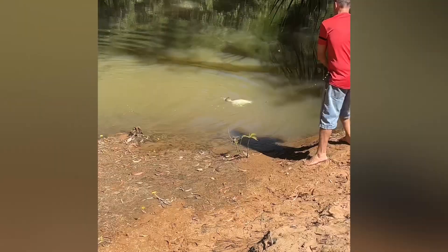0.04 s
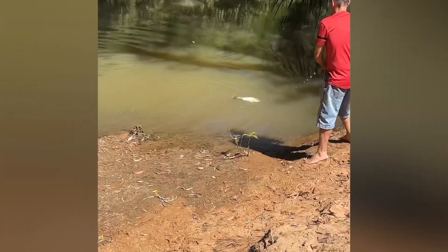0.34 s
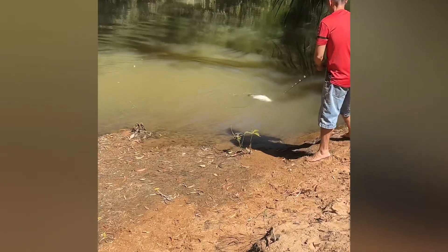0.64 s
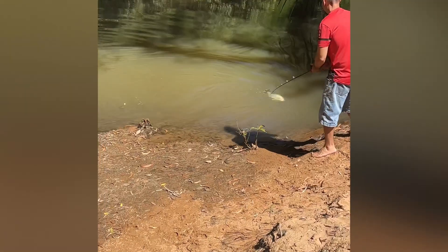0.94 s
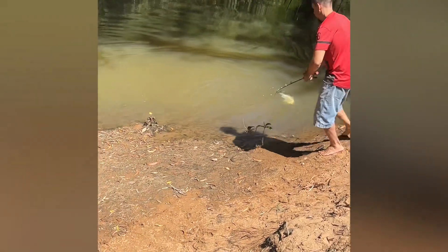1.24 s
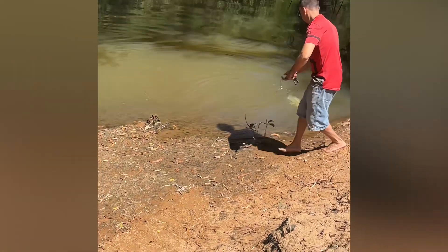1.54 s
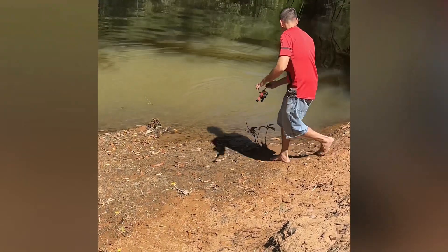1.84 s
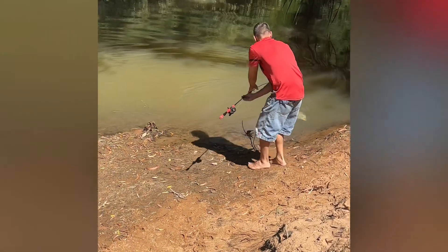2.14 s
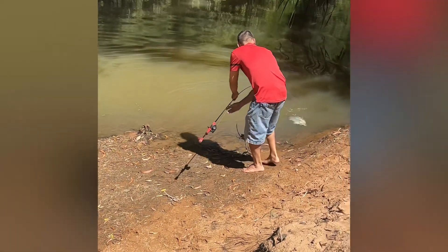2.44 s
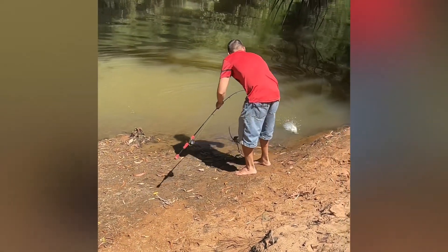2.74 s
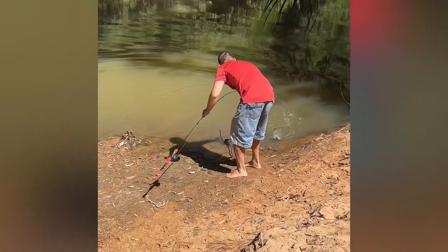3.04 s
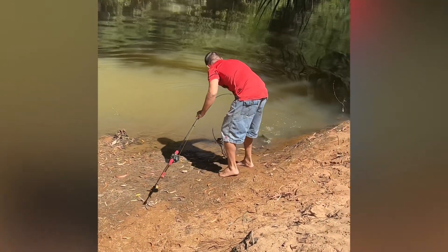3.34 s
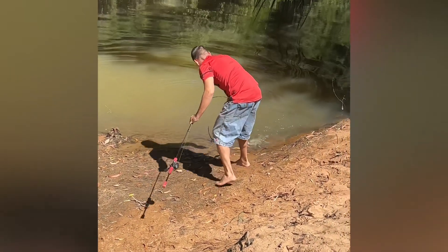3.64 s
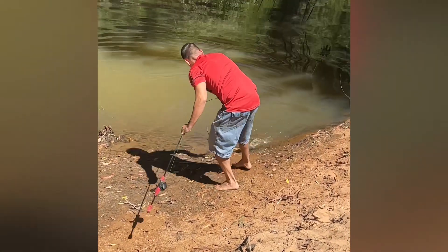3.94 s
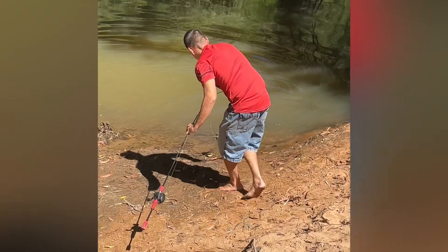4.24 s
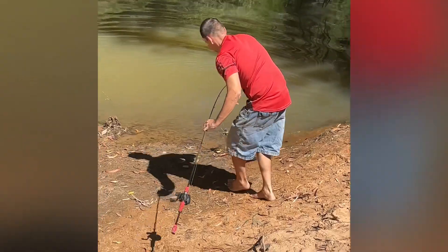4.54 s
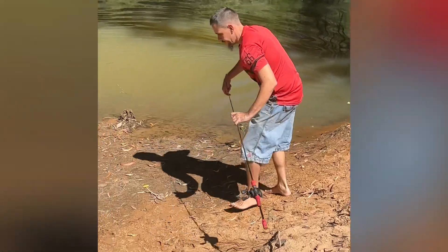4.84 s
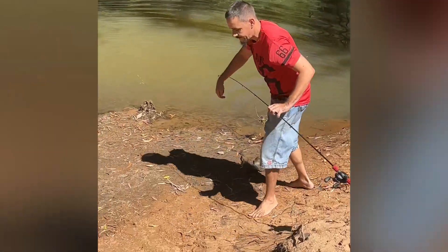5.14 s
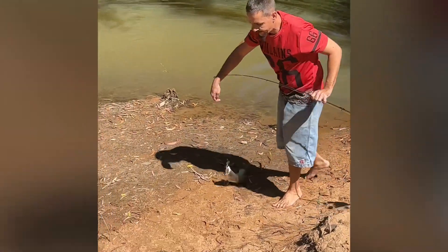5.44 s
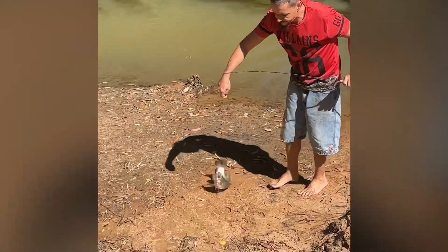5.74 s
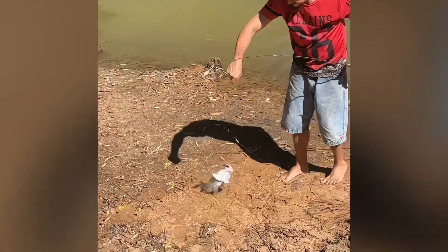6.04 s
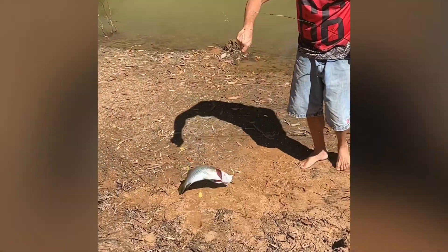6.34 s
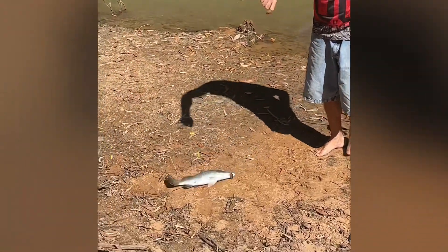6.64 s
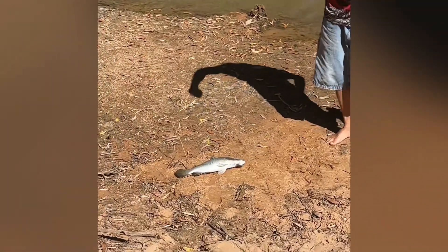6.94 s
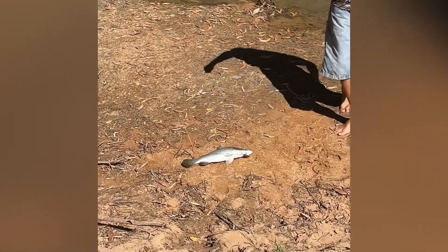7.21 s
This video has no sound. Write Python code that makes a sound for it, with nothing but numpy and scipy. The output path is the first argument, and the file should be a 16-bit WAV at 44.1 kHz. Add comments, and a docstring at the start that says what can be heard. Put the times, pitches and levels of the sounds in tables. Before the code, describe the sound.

A steady outdoor hiss of river and breeze fades in over the first half second and continues throughout, with a few faint sloshes at the start. From about 1 to 1.5 seconds, fingers knock and rub lightly on the hand-held microphone. Three soft, distant hoots follow around 2 seconds. A fishing rod clicks at 2.4 seconds, and a hooked fish makes small splashes and bubbly plops between 2.8 and 3.9. Bare feet scuff and crack dry leaves from about 4.2, and the rod clicks again at 5. Scattered ticks of drops and grit build until, from 6 to 6.5 seconds, the fish thrashes on the dirt close by. This is the loudest part: rapid wet slaps, small pops and dull thuds, with bright leaf crackle and spraying grit. The patter dies away by about 6.8, leaving the hiss until just past 7 seconds.

```python
"""A landed fish thrashes on dry, leaf-littered dirt, close to a hand-held camera.
Its body thuds, its wet flanks and tail slap out trapped air, and each slap throws grit that patters
back onto the leaves. Before that: splashes and bubbles as it is swung from the river, faint rod clicks,
barefoot scuffs, finger knocks on the camera and far hoots, over a steady hiss of river and breeze."""
import sys
import numpy as np
from scipy import signal
from scipy.fft import rfft, irfft, next_fast_len
from scipy.io import wavfile
from scipy.ndimage import uniform_filter1d

SR = 44100
rng = np.random.default_rng(int(sys.argv[2]) if len(sys.argv) > 2 else 0)


def generate_wav(signal):
    """Clip the signal to [-1, 1] and save it as 16-bit WAV at the path in sys.argv[1]."""
    frames = np.transpose(np.atleast_2d(signal))
    scaled = np.clip(frames, -1, 1) * 32767
    pcm = np.round(scaled).astype(np.int16)
    wavfile.write(sys.argv[1], SR, pcm)


N = 325193
TIME = np.arange(N) / SR
# wet skin on dirt: t/s, length/s, trapped-air f/Hz, pop level/dB, grit level/dB
SLAPS = [(6.023, .003, 1240, -31.5, -40), (6.0445, 0.0014, 1100, -32, -25),
         (6.0625, 0.0032, 1200, -26.5, -39), (6.079, 0.00094, 1620, -12, -25),
         (6.0821, 0.00076, 3630, -11, -15), (6.084, 0.0008, 1800, -10, -16),
         (6.102, 0.0012, 1110, -26, -24), (6.15, 0.0039, 1200, -25, -17), (6.158, 0.0022, 905, -25, -23),
         (6.18, .003, 1200, -30, -27), (6.199, 0.0011, 3180, -20, -16.5), (6.205, .0008, 2200, -12.5, -20),
         (6.2082, .0016, 1250, -14, -20), (6.2486, 0.0011, 1680, -19, -12),
         (6.2528, 0.0015, 1790, -25, -12.5), (6.262, 0.0011, 3200, -21, -14),
         (6.272, 0.0016, 1810, -19, -24), (6.2773, 0.0011, 2300, -10.5, -8), (6.279, .0006, 2120, -12, -10),
         (6.2802, 0.0015, 1210, -10.5, -18), (6.286, 0.00073, 1100, -23, -31),
         (6.292, 0.003, 1400, -21, -22), (6.341, 0.0036, 1300, -28, -15.5), (6.385, 0.0019, 3000, -33, -26),
         (6.394, 0.0015, 1880, -29, -16.5), (6.4068, 0.00088, 1070, -20.5, -34),
         (6.42, .001, 1300, -28, -29), (6.4606, 0.00097, 1500, -21.5, -26),
         (6.4738, .0009, 1000, -19.5, -32), (6.486, .0008, 2500, -31, -20), (6.492, .002, 1090, -25.5, -33)]


def slaps(pop_db=0.45, spray_db=0.5, flesh_db=-9.5, flesh_hz=660, noise_share=0.5):
    """Each slap squeezes out air with a sagging pop, smacks dully with the flesh and sprays grit."""
    # grit spray spectrum: f/Hz, density/dB
    spray_spectrum = [(300, -12), (1500, -6), (3500, 0.5), (5500, 3), (8000, 0), (10500, 6.5), (13000, -10),
                      (15500, -1.5)]
    out = np.zeros(N)
    for at_s, length_s, hz, db, grit_db in SLAPS:
        force = blow(length_s, rise=0.47)
        tone = unit_rms(sagging(hz, length_s, sag=0.39))
        pop = (1 - noise_share) * tone + noise_share * band_noise(hz, octaves=0.72)
        flesh = burst(band_noise(flesh_hz, octaves=1.0), blow(1.26 * length_s, rise=0.66))
        spray = coloured(rng.laplace(size=len(force)), spray_spectrum)
        add(out, at_s, gain_of(db + pop_db) * burst(pop, force))
        add(out, at_s, gain_of(db + flesh_db) * flesh)
        add(out, at_s, gain_of(grit_db + spray_db) * burst(spray, force))
    return out


def thuds(trim_db=-1, crumble_gain=0.45, heave_gain=0.26, heave_hz=75):
    """Soft weight on packed earth: low cycles that fall as the contact widens, over a slow heave."""
    # two footfalls, then the fish's body: t/s, level/dB, f/Hz, length/s
    impacts = [(0.952, -35, 66, .011), (3.02, -35, 72, 0.011), (6.035, -29, 109, .007),
               (6.06, -26.5, 298, .0046), (6.077, -20, 165, 0.0064), (6.121, -21, 130, 0.0073),
               (6.1505, -18.5, 240, .004), (6.156, -22, 140, 0.0039), (6.188, -26, 280, .0042),
               (6.205, -24, 120, 0.0057), (6.239, -17, 195, 0.0035), (6.279, -20, 304, 0.0033),
               (6.291, -28, 220, 0.0057), (6.3, -27, 110, 0.0041), (6.329, -26, 210, 0.0057),
               (6.4642, -23, 230, 0.0022), (6.468, -20, 92, 0.0066)]
    out = np.zeros(N)
    for at_s, db, hz, length_s in impacts:
        force = blow(length_s, rise=0.5)
        heave = heave_gain * np.sin(2 * np.pi * heave_hz * TIME[:len(force)])
        push = heave - sagging(hz, 2 * length_s, sag=0.89)
        crumble = crumble_gain * burst(band_noise(1.13 * hz, octaves=0.92), force)
        add(out, at_s, gain_of(db + trim_db) * (force * push + crumble))
    return out


def stirring(rest_db=-63, trim_db=-4.5, lead_s=0.0062, rise_s=0.0091, settle_s=0.024):
    """Litter envelope: slaps throw grit by strength and length; scuffs swell and fade."""
    # bare feet and the fish sliding in the litter: t/s, length/s, level/dB
    scuffs = [(4.14, 0.097, -46), (4.26, 0.15, -46), (5.22, 0.31, -44.5), (5.52, 0.41, -49),
              (5.87, 0.19, -39), (6.088, 0.051, -30), (6.16, 0.072, -26.5), (6.22, 0.05, -24),
              (6.287, 0.09, -25), (6.385, 0.062, -31), (6.49, 0.1, -39), (6.598, 0.19, -42.5)]
    power = np.full(N, gain_of(rest_db) ** 2)
    t = TIME[:SR]
    landing = (1 - np.exp(-(t / rise_s) ** 2)) * np.exp(-t / settle_s) / settle_s
    for at_s, length_s, _, _, grit_db in SLAPS:
        add(power, at_s - lead_s, gain_of(trim_db) ** 2 * gain_of(grit_db) * length_s * landing)
    for at_s, length_s, db in scuffs:
        add(power, at_s, (gain_of(db) * half_sine(length_s)) ** 2)
    return np.sqrt(power)


def litter(ping_db=-7, crumb_db=-14, drag_db=-13.5, side_db=-11):
    """Stirred leaves and crumbs crackle and ping over a dull drag on the ground; stereo."""
    # leaf crackle ahead: f/Hz, density/dB
    mid_spectrum = [(300, -13), (1200, -7.5), (2500, -6), (4000, -5.5), (6500, -4), (8500, -2.5),
                    (11200, 4), (13000, -2), (15500, -0.5)]
    # leaf crackle off to the sides: f/Hz, density/dB
    side_spectrum = [(3500, -40), (5500, -7), (7500, 0), (10000, 3), (12000, -16.5), (14500, 0)]
    # ground drag: f/Hz, density/dB
    drag_spectrum = [(25, -30), (50, -9), (80, 1), (130, 0.5), (220, -4), (450, -1.5), (900, -17),
                     (3000, -47)]
    leaves = crackle(np.linspace(700, 15700, num=16), per_s=6000, spread_db=4, ring_cycles=1.3)
    pings = crackle(np.linspace(10700, 11800, num=4), per_s=330, spread_db=1.0, ring_cycles=8)
    crumbs = crackle(np.linspace(5400, 7000, num=4), per_s=300, spread_db=2.6, ring_cycles=5)
    drag = coloured(rng.standard_normal(N), drag_spectrum)
    mid = coloured(leaves, mid_spectrum)
    mid += gain_of(ping_db) * pings + gain_of(crumb_db) * crumbs + gain_of(drag_db) * drag
    side = gain_of(side_db) * coloured(np.roll(leaves, N // 2), side_spectrum)  # roll decorrelates
    return stirring() * np.array([mid + side, mid - side])


def crackle(pitches_hz, per_s, spread_db, ring_cycles):
    """Each pitch is a leaf or crumb struck at random; a few strikes are large. Rms 1."""
    out, t = np.zeros(N), TIME[:1024]
    chance = per_s / len(pitches_hz) / SR
    for hz in pitches_hz:
        draw, sign = rng.random(N), rng.choice([-1, 1], N)
        hit, strikes = draw < chance, np.zeros(N)
        strength = np.minimum(-np.log(draw[hit] / chance), 4)  # exponential, capped
        strikes[hit] = sign[hit] * gain_of(spread_db * strength)
        ring = unit_rms(np.sin(2 * np.pi * hz * t) * np.exp(-t * hz / ring_cycles))
        out += signal.oaconvolve(strikes, ring)[:N]
    return unit_rms(out)


def ticks(trim_db=2, centre_hz=11000, scatter=0.024, length_s=0.00096, snap_gain=0.33):
    """The largest drops and grains hit dry leaves: very high pings with a dry snap."""
    # landings: t/s, level/dB
    landings = [(4.1975, -34), (5.2555, -38), (5.4366, -33), (5.5468, -33), (5.5838, -25), (5.6045, -31),
                (5.6103, -23), (5.668, -38), (5.756, -33), (5.8973, -23), (5.9385, -25), (5.9679, -28),
                (5.9773, -17.5), (6.0171, -15), (6.0281, -17), (6.04, -15), (6.0704, -16), (6.1035, -14),
                (6.1065, -15), (6.1544, -10), (6.173, -14), (6.2021, -10), (6.2435, -14), (6.2496, -9),
                (6.255, -10), (6.261, -9), (6.295, -12), (6.329, -8), (6.3315, -14), (6.359, -14),
                (6.3663, -6), (6.369, -9.5), (6.4857, -14), (6.49, -18), (6.4935, -22), (6.497, -21),
                (6.5115, -20), (6.5243, -18), (6.5277, -19), (6.531, -16), (6.5445, -25), (6.5535, -21),
                (6.6365, -25), (7.1204, -32)]
    out = np.zeros(N)
    for at_s, db in landings:
        hz = centre_hz * (1 + scatter * rng.uniform(-0.89, 1))
        ping = band_noise(hz, octaves=0.076) + snap_gain * band_noise(hz, octaves=0.36)
        add(out, at_s, gain_of(db + trim_db) * burst(ping, blow(length_s, rise=0.49)))
    return out


def snaps():
    """Dry leaves break underfoot and under the fish with short, bright cracks."""
    # leaf breaks: t/s, level/dB, f/Hz, length/s
    breaks = [(3.29, -34, 9500, .0028), (3.354, -37, 8500, .002), (4.2715, -36, 9500, .0008),
              (4.2894, -25.5, 11000, .0014), (4.293, -29, 6500, .001), (4.3208, -40, 10500, .0007),
              (4.345, -26, 10000, 0.0012), (4.3505, -34, 9500, .0008), (6.0835, -11.5, 4770, 0.00092),
              (6.204, -11, 7500, 0.0006), (6.2538, -13, 6500, .001), (6.2792, -7.5, 5500, 0.00067),
              (6.28, -9, 9000, 0.00079), (6.363, -23, 6500, .0008), (6.3952, -17, 6400, 0.00076),
              (6.418, -20.5, 6700, .0009), (6.4853, -14, 5660, 0.00056), (6.5375, -28, 6600, .0012),
              (6.5535, -28, 6500, .0006), (6.5617, -28, 6400, .0007), (6.6426, -27, 6350, .0012),
              (6.7, -30, 8100, .0024)]
    out = np.zeros(N)
    for at_s, db, hz, length_s in breaks:
        add(out, at_s, gain_of(db) * burst(band_noise(hz, octaves=0.3), blow(length_s)))
    return out


def rod(click_hz=4600):
    """Each knock on rod and reel is a dry click that briefly rings the same modes."""
    # knocks: t/s, ring level/dB, length/s, click level/dB
    knocks = [(2.4353, -24.5, .0012, -31), (2.4425, -44, .01, -37.5), (4.9812, -22.5, 0.00037, -20.5),
              (4.984, -52, .011, -41), (5.005, -36, .0011, -29)]
    # rod and reel modes: f/Hz, level/dB
    modes = [(2750, -0.5), (5600, -7), (8450, -4)]
    out = np.zeros(N)
    for at_s, ring_db, length_s, click_db in knocks:
        force = blow(length_s)
        add(out, at_s, gain_of(click_db) * burst(band_noise(click_hz, octaves=1.2), force))
        for hz, mode_db in modes:
            ring = sagging(hz, 2 * length_s, sag=0.15)
            add(out, at_s, gain_of(ring_db + mode_db) * burst(ring, force))
    return out


def splashes(size=8192):
    """The fish breaks the surface: faint sloshes and short bursts of spray."""
    # sloshes and spray: t/s, level/dB, length/s, f/Hz, width/octaves
    sloshes = [(.15, -39, 0.049, 900, .5), (0.479, -43.5, .03, 260, .25), (0.621, -40, 0.028, 248, 0.17),
               (2.801, -34, .01, 1400, 0.61), (2.816, -37, .005, 3870, .15),
               (3.184, -32, 0.0042, 5500, 0.83), (3.2, -43, 0.028, 4200, 0.97),
               (3.212, -41, 0.0063, 2190, 0.41), (3.842, -38, 0.02, 1900, 0.79),
               (3.865, -32.5, 0.0041, 2150, .28)]
    out = np.zeros(N)
    for at_s, db, length_s, hz, octaves in sloshes:
        add(out, at_s, gain_of(db) * burst(band_noise(hz, octaves, size), blow(length_s, size=size)))
    return out


def plops(ring_cycles=7, glide_per_s=6):
    """Bubbles ring briefly and rise in pitch as they reach the surface."""
    # bubbles from the river and the dripping fish: t/s, level/dB, start f/Hz
    bubbles = [(2.766, -34, 2200), (2.803, -33, 1590), (2.808, -33, 1270), (2.81, -28.5, 727),
               (2.815, -32, 1830), (3.196, -30.5, 1520), (3.218, -30, 2130), (5.943, -30, 1870)]
    out, t = np.zeros(N), TIME[:2048]
    for at_s, db, hz in bubbles:
        chirp = np.sin(2 * np.pi * hz * (t + glide_per_s * t ** 2 / 2))
        add(out, at_s, gain_of(db) * blow(ring_cycles / hz, size=len(t)) * chirp)
    return out


def handling():
    """Fingers knock and rub the camera case, driving the two microphone ports in antiphase."""
    # finger knocks: t/s, level/dB, f/Hz, length/s
    knocks = [(.9845, -27, 660, 0.0011), (1.033, -23, 640, 0.0013), (1.147, -24, 540, 0.0015),
              (1.201, -32, 500, .002), (1.295, -22, 650, .0024)]
    # finger rubs: t/s, length/s, level/dB, f/Hz
    rubs = [(.62, 0.95, -46, 624), (1.3, .024, -35.5, 570), (1.455, .075, -41, 420)]
    out = np.zeros(N)
    for at_s, db, hz, length_s in knocks:
        add(out, at_s, gain_of(db) * blow(length_s, rise=0.7) * sagging(hz, 2 * length_s, sag=0.8))
    for at_s, length_s, db, hz in rubs:
        stroke = half_sine(length_s)
        friction = band_noise(hz, octaves=0.63, size=65536)[:len(stroke)]
        add(out, at_s, gain_of(db) * burst(friction, stroke))
    return np.array([out, -out])


def hoots():
    """Soft, nearly pure notes, blurred by distance."""
    # far notes: t/s, level/dB, f/Hz, length/s
    notes = [(1.905, -42.5, 471, 0.056), (1.975, -44, 453, 0.048), (2.2, -45.5, 474, 0.047)]
    out = np.zeros(N)
    for at_s, db, hz, length_s in notes:
        swell = half_sine(length_s)
        tone = np.sin(2 * np.pi * hz * TIME[:len(swell)])
        blur = 0.5 * band_noise(hz, octaves=0.09, size=8192)[:len(swell)]
        add(out, at_s, gain_of(db) * unit_rms((tone + blur) * swell))
    return out


def bank_echo(x, t60_s=0.15, echoes_per_s=2000, gap_s=0.004, size=16384):
    """Sparse mono scatter from the bank and the trees."""
    t = TIME[:size]
    echoes = rng.standard_normal(size) * (rng.random(size) < echoes_per_s / SR)
    tail = echoes * gain_of(-60 * t / t60_s) * (t > gap_s)
    return signal.fftconvolve(x, tail / np.linalg.norm(tail))[:N]


def outdoors(level_db=-36.5, patch_db=1.39, flicker_db=0.5, hiss_follow=0.2, hiss_db_per_s=0.14):
    """Rumble, river, breeze and leaf hiss: four slowly swelling noise bands with drifting patches."""
    # mean spectrum: f/Hz, density/dB
    air_spectrum = [(20, -37), (45, -11), (75, -2.5), (130, -9.5), (200, -9.5), (250, -3.3), (340, 0.24),
                    (600, -0.63), (1300, -3), (2200, -8.5), (3800, -13.5), (6500, -14), (10300, -17),
                    (12500, -49), (15500, -22)]
    # slow swells: t/s, level/dB
    rumble_swell = [(.7, 0.5), (1.55, 3), (2.0, -.5), (4.0, 1), (5.65, -3.5), (6.8, 3), (7.25, -4)]
    river_swell = [(.7, -3.5), (1.35, -2), (1.6, -3), (2.1, -4), (2.7, 1.3), (3.8, 1.5), (4.2, 0.5),
                   (5.0, 1.5), (5.45, -1.5), (5.61, -8.5), (5.78, 1), (5.92, -3), (6.65, 1.7), (7.3, 1.2)]
    breeze_swell = [(.6, -0.5), (.8, 0.8), (1.1, -1.3), (1.36, 0.5), (1.7, -2.6), (2.25, .5), (3.0, 1),
                    (4.3, -0.6), (6.0, .5), (7.3, -.5)]
    # band centres of rumble, river, breeze, leaf hiss: f/Hz
    centres_hz = [100, 400, 1100, 4000]
    # left-right likeness: f/Hz, coherence
    likeness = [(60, 0.92), (300, 0.97), (640, 0.9), (1400, 1), (5000, 1), (5800, 0.91), (10000, 1),
                (12000, 1), (14500, 0.52)]
    frames, hz = N // 256 + 5, np.fft.rfftfreq(1024, 1 / SR)
    t = np.arange(frames) * 256 / SR
    left_re, left_im, other_re, other_im, patches = rng.standard_normal((frames, 513, 5)).T
    patches = uniform_filter1d(patches, 4, axis=0)  # across frequency
    patches = unit_rms(uniform_filter1d(patches, 12, axis=1))  # across time
    patches *= at_hz([(300, 1.26), (1000, 0.8), (3000, 0.6)], hz)[:, None]  # water laps, hiss is smoother
    flicker = unit_rms(uniform_filter1d(rng.standard_normal(frames), 5))
    coherence = at_hz(likeness, hz)[:, None]
    left = left_re + 1j * left_im
    right = coherence * left + np.sqrt(1 - coherence ** 2) * (other_re + 1j * other_im)
    left *= gain_of(at_hz([(200, 0), (600, 2.5), (1100, 2), (2000, 0)], hz))[:, None]  # river to the left
    breeze_db = at_time(breeze_swell, t)
    hiss_db = hiss_follow * breeze_db + hiss_db_per_s * (t - t.mean())
    bands_db = [at_time(rumble_swell, t), at_time(river_swell, t), breeze_db, hiss_db]
    weights = [at_hz(list(zip(centres_hz, band)), hz) for band in np.eye(len(bands_db))]
    swell_db = sum(np.outer(weight, db) for weight, db in zip(weights, bands_db))
    shape_db = at_hz(air_spectrum, hz)[:, None] + swell_db + patch_db * patches + flicker_db * flicker
    _, air = signal.istft(np.array([left, right]) * gain_of(shape_db), nperseg=1024, noverlap=768)
    return gain_of(level_db) * unit_rms(air[:, :N])


def blow(length_s, rise=0.2, size=4096):
    """Contact force, peak 1: quick rise, then decay, on the time scale length_s."""
    u = TIME[:size] / length_s
    force = (1 - np.exp(-(u / rise) ** 2)) * np.exp(-u / 1.42)
    return force / force.max()


def half_sine(length_s):
    """One swell and fade."""
    return np.sin(np.pi * TIME[TIME < length_s] / length_s)


def sagging(hz, length_s, sag, size=4096):
    """Tone that sinks from above hz to below it as the contact relaxes."""
    pitch_hz = hz * (1 + sag * (np.exp(-TIME[:size] / length_s) - 0.5))
    return np.sin(2 * np.pi * np.cumsum(pitch_hz) / SR)


def band_noise(hz, octaves, size=4096):
    """Noise in a bell around hz, rms 1."""
    distance = np.log2((np.fft.rfftfreq(size, 1 / SR) + 1) / hz) / octaves
    return unit_rms(irfft(rfft(rng.standard_normal(size)) * np.exp(-0.5 * distance ** 2)))


def burst(x, force):
    """x shaped by a force, with the force's energy."""
    return x * force * np.linalg.norm(force) / np.linalg.norm(x * force)


def coloured(x, spectrum):
    """x filtered by a (f/Hz, level/dB) table, rms 1."""
    size = next_fast_len(len(x))
    gain = gain_of(at_hz(spectrum, np.fft.rfftfreq(size, 1 / SR)))
    return unit_rms(irfft(rfft(x, size) * gain, size)[:len(x)])


def at_hz(points, hz):
    """Table lookup over log frequency."""
    f, value = np.transpose(points)
    return np.interp(np.log(hz + 1), np.log(f + 1), value)


def at_time(points, t):
    """Table lookup over time."""
    return np.interp(t, *np.transpose(points))


def gain_of(db):
    """dB to amplitude factor."""
    return 10 ** (np.asarray(db) / 20)


def unit_rms(x):
    """x at rms 1."""
    return x / np.sqrt(np.mean(x ** 2) + 1e-20)


def add(mix, at_s, sound):
    """Adds sound into mix in place."""
    part = mix[round(at_s * SR):][:len(sound)]
    part += sound[:len(part)]


def scene(near_send_db=-15.5, far_send_db=-8.0):
    """Fish and angler in the open air; far sounds carry more echo."""
    near = slaps() + thuds() + ticks() + snaps() + rod() + splashes()
    far = plops() + hoots()
    send = gain_of(near_send_db) * near + gain_of(far_send_db) * far
    return near + far + litter() + bank_echo(send) + handling() + outdoors()


def record(dry, highpass_hz=40, lowpass_hz=16050):
    """Two microphone ports part in phase in the treble; then bass cut, fade-in, clip, band limit."""
    # phase between the ports: f/Hz, left lead/rad
    port_phase = [(200, 0), (650, 0.33), (1500, 0), (5200, 0), (7000, -1.05), (10200, -2.5), (11300, -3),
                  (13400, -3), (14300, -4.5), (15800, -4.5)]
    # fade-in: t/s, level/dB
    fade_in = [(.03, -70), (.06, -29), (.12, -18), (.22, -11.5), (.4, -6), (.66, -0.5)]
    size = next_fast_len(N)
    lead_rad = at_hz(port_phase, np.fft.rfftfreq(size, 1 / SR))
    rotation = np.exp(0.5j * np.outer([1, -1], lead_rad))
    ports = irfft(rfft(dry, size) * rotation, size)[:, :N]
    ports = signal.sosfilt(signal.butter(4, highpass_hz, "highpass", fs=SR, output="sos"), ports)
    clipped = np.clip(ports * gain_of(at_time(fade_in, TIME)), -1, 1)
    lowpass = signal.firwin(511, lowpass_hz, window=("kaiser", 9), fs=SR)
    return signal.oaconvolve(clipped, lowpass[None], "same")


dry = scene()
out = record(dry)
generate_wav(out)
```